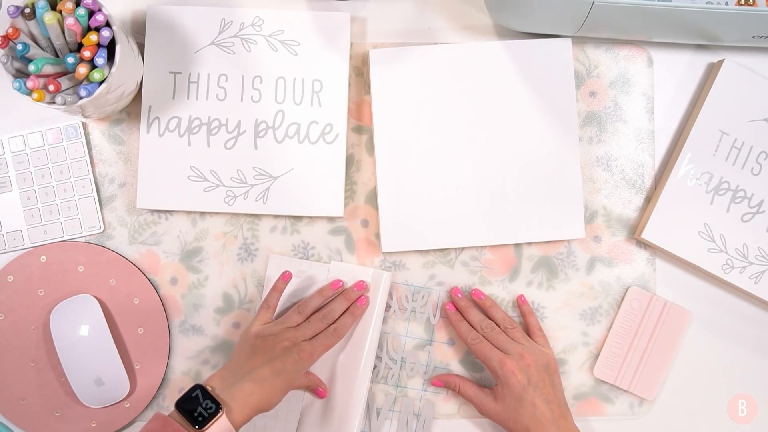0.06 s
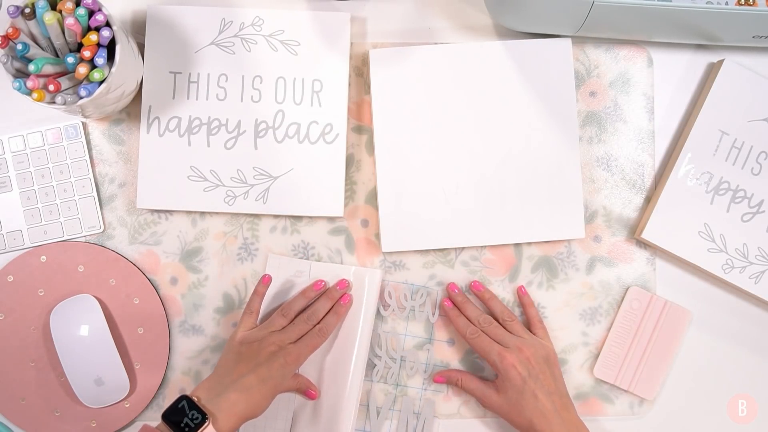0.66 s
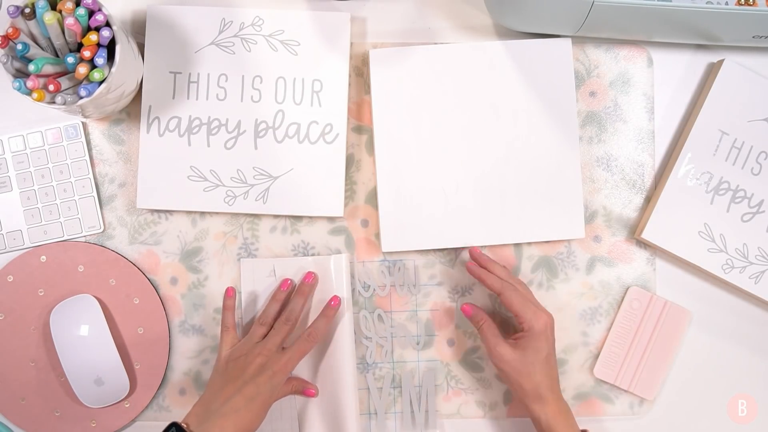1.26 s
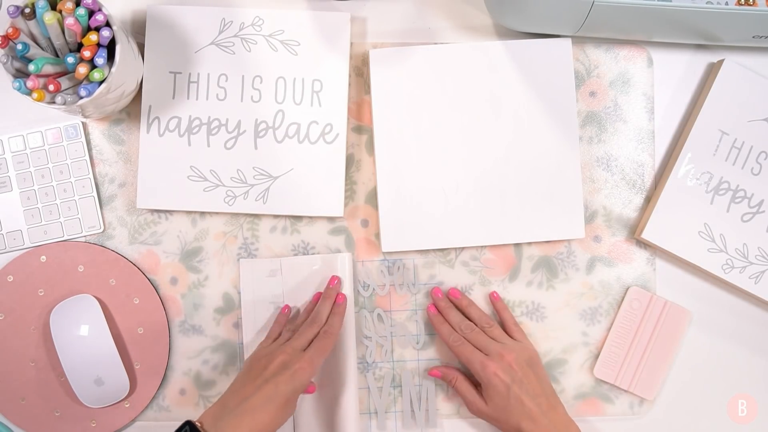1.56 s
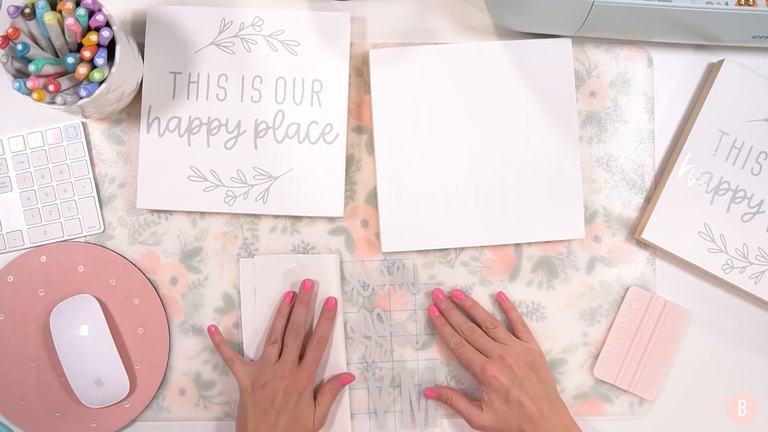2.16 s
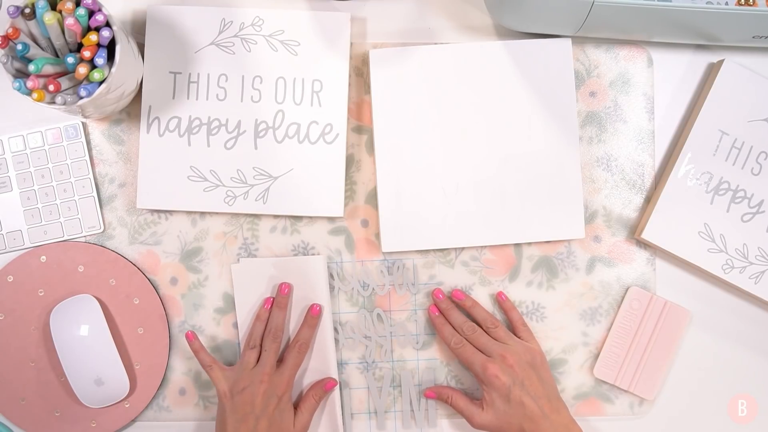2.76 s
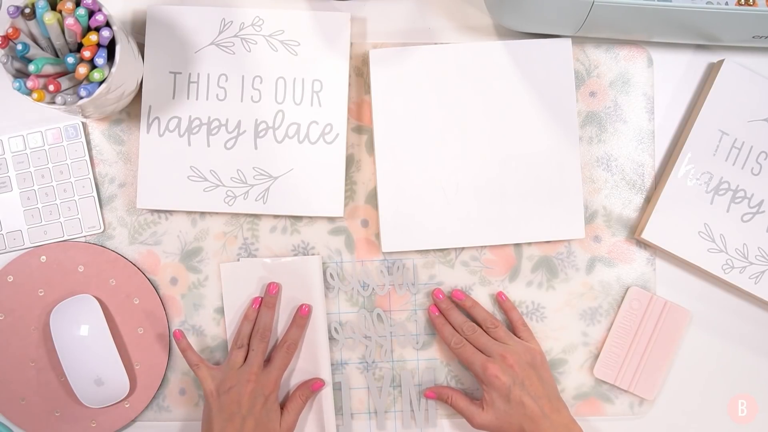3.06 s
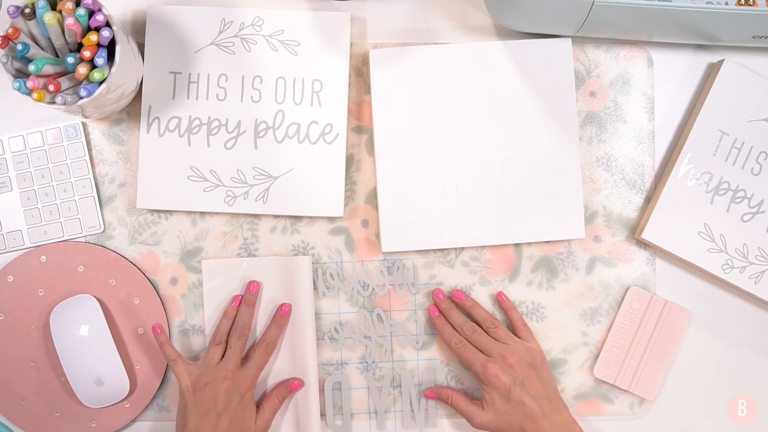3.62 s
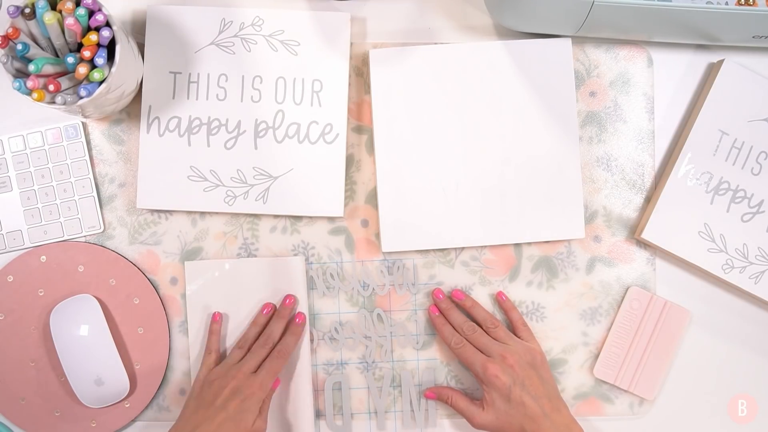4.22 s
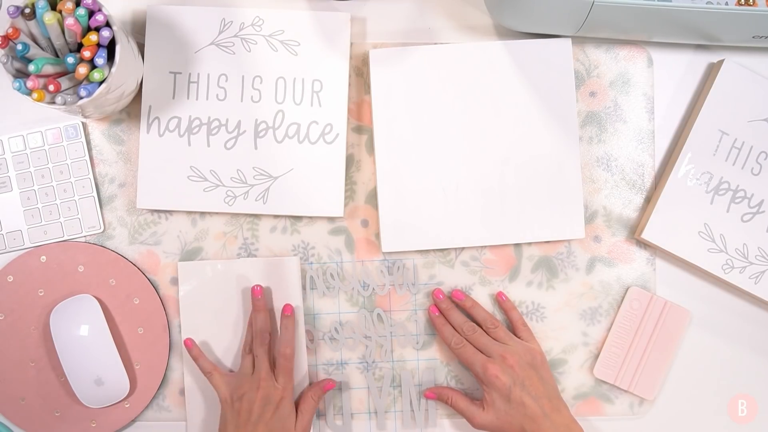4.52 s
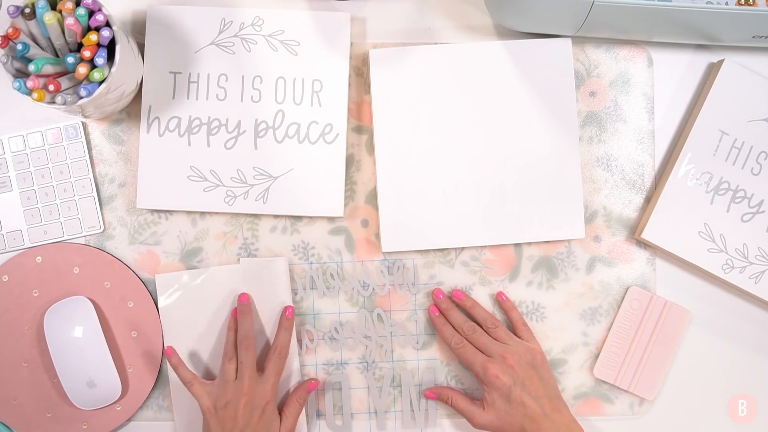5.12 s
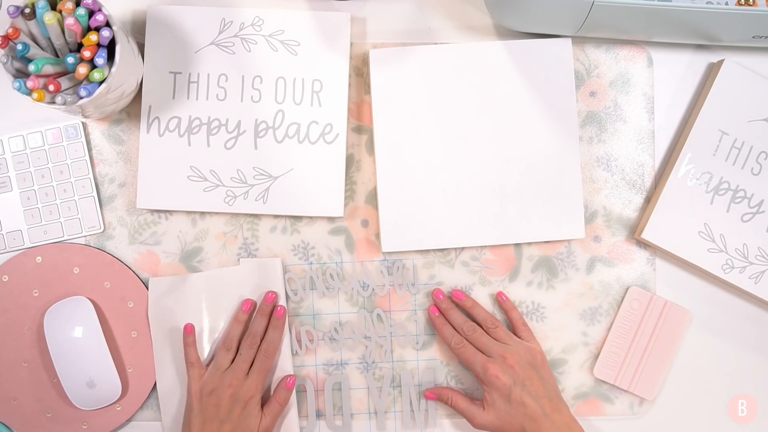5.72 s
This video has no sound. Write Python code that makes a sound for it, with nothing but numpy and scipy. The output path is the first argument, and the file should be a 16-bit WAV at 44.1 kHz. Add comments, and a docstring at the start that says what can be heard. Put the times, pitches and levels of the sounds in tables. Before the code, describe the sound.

In a small room with a faint electrical hum, a microphone over a table catches the soft, ticking crackle of paper coming away from sticky vinyl. The sheet snaps and briefly wobbles, a hand rubs across it, and the slow peeling continues. Past the middle the paper gives its loudest hollow pops between brief pulls, and it ends with brushing strokes and more crinkles.

```python
"""A craft table in a small room, one microphone above it; a faint mains hum throughout.
Backing paper is rolled slowly off adhesive vinyl: the glue lets go in a fine crackling hiss and
the curled sheet buckles in dry snaps. At one second the slack sheet wobbles, then a hand slides
over the paper for a new hold and the peeling goes on. The loudest hollow pops come after four
seconds, among short pulls; the last second is strokes of the hand and more snaps."""
import sys
import numpy as np
from scipy import signal
from scipy.fft import rfft, irfft, next_fast_len
from scipy.io import wavfile

SR = 44100
rng = np.random.default_rng(int(sys.argv[2]) if len(sys.argv) > 2 else 0)


def persist_wave(psi):
    """Save psi, clipped to +-1, as 16-bit WAV."""
    counts = np.round(np.clip(psi, -1, 1) * 32767).astype(np.int16)
    wavfile.write(sys.argv[1], SR, np.atleast_2d(counts).T)


N = 263718

# the three resonances of a paper crease, clack, tick and fizz: f/Hz, Q
CREASE_MODES = [(3050, 2.23), (6300, 2.1), (12800, 3.8)]


def from_db(db):
    """Decibels to gain."""
    return 10 ** (np.asarray(db) / 20)


def unit(x):
    """Scales to rms 1."""
    return x / np.sqrt(np.mean(x ** 2) + 1e-20)


def at_hz(points, hz):
    """Reads a table on a log-frequency axis."""
    f, value = np.transpose(points)
    return np.interp(np.log(hz + 1), np.log(f + 1), value)


def add(mix, s, sound):
    """Mixes a sound in at time s."""
    part = mix[max(round(s * SR), 0):][:len(sound)]
    part += sound[:len(part)]


def filtered(x, gain):
    """Applies a gain that is a function of frequency."""
    size = next_fast_len(len(x) + 2048)
    return irfft(rfft(x, size) * gain(np.fft.rfftfreq(size, 1 / SR)), size)[:len(x)]


def coloured(x, colour):
    """Equalises with a table of f/Hz, level/dB."""
    return filtered(x, lambda f: from_db(at_hz(colour, f)))


def drift(rate_hz):
    """A random wander of rms 1, mostly slower than rate_hz."""
    return unit(filtered(rng.standard_normal(N), lambda f: 1 / (1 + (f / rate_hz) ** 4)))


def paper_ring(hz, q, cutoff_ratio=2.21, size=1024):
    """A few cycles of damped paper with a rounded start, holding the energy of 1 ms at rms 1."""
    ratio = (np.fft.rfftfreq(size, 1 / SR) + 1) / hz
    resonance = 1 / (1 + 1j * max(q, .3) * (ratio - 1 / ratio)) ** 2
    lowpass = 1 / (1 + 1j * np.sqrt(2) * ratio / cutoff_ratio - (ratio / cutoff_ratio) ** 2)
    wave = irfft(resonance * lowpass, size)
    wave[size // 2:] = 0
    return wave / np.linalg.norm(wave) * np.sqrt(SR / 1000)


def reflections(x, tail_db=-5, build_s=0.001):
    """What reaches the microphone indirectly: nearby echoes, then the room's short diffuse tail."""
    # echoes off the table top and things on it: delay/s, gain
    echoes = [(.0011, .18), (.0029, .34), (.0044, .14), (.0074, -.2), (.0109, .21), (.0146, -.15),
              (.0185, .13), (.0225, .11)]
    # reverberation time of the room: f/Hz, t60/s
    decay = [(300, 0.36), (1000, 0.2457), (2000, 0.2857), (6000, 0.26), (15000, 0.13)]
    # colour that absorption leaves on the reflected sound: f/Hz, level/dB
    surface_colour = [(300, -3), (2000, -3), (4000, 1.5), (7000, -2.5), (15000, 2)]
    t = np.arange(SR // 4) / SR
    hz, frame_s, spectra = signal.stft(rng.standard_normal(len(t)), SR, nperseg=256)
    fading = from_db(-60 * frame_s / at_hz(decay, hz)[:, None])
    tail = signal.istft(spectra * fading, SR, nperseg=256)[1][:len(t)]
    tail *= 1 - np.exp(-t / build_s)
    response = from_db(tail_db) * tail / np.linalg.norm(tail)
    for delay, gain in echoes:
        # each sound leaves the sheet at another spot, so its echo paths differ a little
        add(response, delay * rng.uniform(.9, 1.1), np.array([gain]))
    return signal.fftconvolve(x, coloured(response, surface_colour))[:N]


def effort(moves, attack_s, release_s, swell_db):
    """Gains of body and treble as each move fades in, swells to its middle and fades out."""
    t, body, treble = np.arange(N) / SR, np.zeros(N), np.zeros(N)
    for start, length, db, bright_db in moves:
        age = t - start
        fade_in = np.clip(.5 + age / attack_s, 0, 1)
        fade_out = np.clip(.5 + (length - age) / release_s, 0, 1)
        off_centre = np.minimum((2 * age / length - 1) ** 2, 1)
        gain = fade_in * fade_out * from_db(db - swell_db * off_centre)
        body += gain
        treble += gain * from_db(bright_db)
    return body, treble


def friction(gains, colour, slips_per_s, spread_db, flutter_db, flutter_hz, room_db, body_db, treble_db):
    """Countless tiny slips of uneven size, coming in clumps; body and treble each follow their gain."""
    body_gain, treble_gain = gains
    sizes = from_db(spread_db * np.minimum(rng.exponential(1, N), 4.5)) * rng.choice([-1, 1], N)
    slipping = rng.random(N) < slips_per_s / SR
    slips = sizes * slipping * from_db(flutter_db * drift(flutter_hz))
    slips = coloured(slips + from_db(room_db) * reflections(slips), colour)
    body = filtered(slips, lambda f: 1 / (1 + (f / 4000) ** 8))  # below 4 kHz
    treble = slips - body
    return body_gain * from_db(body_db) * unit(body) + treble_gain * from_db(treble_db) * unit(treble)


def room_tone(air_db=-56.5, waver=0.16, wander_rad=0.46):
    """Still air of the room and the wavering hum of an appliance."""
    # spectrum of the air: f/Hz, level/dB
    air_colour = [(20, 12), (35, 9), (50, 2), (100, 1), (230, 0), (400, -3), (620, -9), (1100, -10),
                  (2000, -7), (3000, -13), (4300, -20), (6500, -21), (9500, -24), (15500, -26)]
    # tones of the appliance: f/Hz, rms level/dB
    hum_tones = [(29, -56), (59, -67), (120, -61), (168, -65), (298, -76.5), (402, -75), (880, -70.5)]
    air = coloured(rng.standard_normal(N), air_colour)
    air /= np.std(filtered(air, lambda f: f > 200))  # air_db is the level above 200 Hz
    t, hum = np.arange(N) / SR, np.zeros(N)
    for hz, db in hum_tones:
        amplitude = np.sqrt(2) * from_db(db) * (1 + waver * drift(3.4))
        hum += amplitude * np.sin(2 * np.pi * hz * t + wander_rad * drift(2.7))
    return from_db(air_db) * air + hum


def peeling(pull):
    """Glue parts from the backing in a dense, even crackle."""
    # spectrum of the parting glue: f/Hz, level/dB
    glue_colour = [(300, -58), (700, -9), (1100, -5), (1550, 3.5), (1850, 2), (2200, 5.5), (3100, 0.5),
                   (3700, -6.5), (4500, -10), (5900, -3.5), (7400, -7), (9500, -16.5), (12000, -19.5),
                   (15500, -25)]
    return friction(pull, glue_colour, slips_per_s=6000, spread_db=1.6, flutter_db=1.6, flutter_hz=39,
                    room_db=-3.5, body_db=-1.5, treble_db=-1)


def glue_ticks(pull_gain, per_s=22, level_db=-3, spread_db=3):
    """Now and then a larger spot of glue lets go; harder peeling makes the ticks louder."""
    sizes = from_db(level_db + spread_db * np.minimum(rng.exponential(1, N), 3))
    letting_go = rng.random(N) < per_s / SR
    ticks = signal.fftconvolve(pull_gain * sizes * letting_go, paper_ring(hz=7000, q=1))[:N]
    return ticks + reflections(ticks) / 2


def snaps(push_db=-22, clack_db=-7, fizz_db=-18.5, run_s=0.00084, run_share=0.38, crease_room_db=-1):
    """A paper panel flips with a pop and a push of air as its crease gives way in a run of ticks."""
    # loud buckles of the sheet: t/s, pop level/dB, pop f/Hz, pop Q, tick level/dB, crease brightness/dB
    buckles = [(0.136, -32.5, 1530, 0.97, -31.5, 7), (0.5716, -35.5, 1850, 1.2, -37, -10.5),
               (0.6856, -50, 2050, 3, -48.5, -25), (0.7439, -31.5, 2640, 2.3, -48, 0),
               (0.7629, -20, 1920, 1.04, -31.5, -13.5), (1.0477, -25, 1280, 0.34, -23, -1),
               (1.0654, -27, 1930, 1, -26, 0), (1.0937, -30, 1720, 0.67, -33.5, 9),
               (1.244, -37, 1540, 1.7, -50, 0), (1.2564, -39, 1550, 1, -42, 1),
               (1.468, -29, 2100, 2.7, -36, -6), (1.489, -32, 1220, 0.42, -54, 3),
               (1.7242, -33.5, 1690, 0.54, -37, 0), (1.8189, -31.5, 1670, 0.28, -54, 0),
               (1.8496, -31, 1340, 0.48, -49, -5), (1.9567, -32, 1330, 1.8, -57, 0),
               (1.9887, -23, 1140, 1.2, -43, -2), (2.1456, -34, 2270, 2.1, -34, 12),
               (2.2433, -41.5, 2220, 4, -43, 0), (2.422, -43, 2150, 7, -48, 2),
               (2.6026, -43, 1930, 0.73, -33, -1.5), (2.64, -36.5, 2230, 2.5, -34, 15),
               (2.6712, -34, 1750, 1.9, -29, 6), (3.0422, -45, 1530, 0.78, -34, 0),
               (3.1704, -41, 2400, 1.1, -34, 0), (3.184, -30.5, 1640, 0.45, -22, 0.5),
               (3.5972, -34, 1580, 0.97, -53, -26), (3.85, -37, 930, 0.58, -37.5, 12),
               (3.9366, -23.5, 1160, 1.9, -45, 0), (4.03, -26.5, 1830, 1.3, -40.5, 12),
               (4.1079, -28, 1720, 1.8, -41.5, -2), (4.1222, -31, 1900, 1.1, -45, -2),
               (4.1287, -7, 1830, 2.07, -31, -14), (4.4869, -24.5, 1410, 0.66, -27, 8.5),
               (4.4916, -23.5, 1900, 2.4, -29, -14.5), (4.5439, -27, 1560, 2, -42.5, -17),
               (4.5978, -37, 1830, .74, -41, -8), (4.6288, -10, 1400, 1.26, -29, -11),
               (4.8452, -36.5, 1900, 5.5, -34.5, 0), (4.9404, -31.5, 1620, 0.76, -40.5, -4),
               (5.045, -18.5, 1650, 2.3, -62, 0), (5.066, -20, 1240, 1.1, -46, 6),
               (5.076, -24.5, 1560, 1.6, -58, 0), (5.1623, -37.5, 1400, 0.87, -38.5, 3),
               (5.303, -36.5, 1660, 0.38, -56, 3), (5.3187, -26.5, 1240, 4, -42, -12),
               (5.3227, -27, 1090, 0.28, -45, -7), (5.4211, -17.5, 1640, 0.9, -30.5, -6),
               (5.4647, -24, 1150, 0.16, -61, 0), (5.4679, -30.5, 1600, 1.1, -46, 0),
               (5.698, -38.5, 2020, 0.58, -31, 3), (5.7131, -31, 2150, 1.5, -23, 11.5),
               (5.7737, -48, 1630, 1.3, -33, -6.5), (5.9697, -37, 2350, 2.6, -37.5, 0)]
    out, t = np.zeros(N), np.arange(256) / SR
    giving_way = run_share * np.exp(-t / run_s)
    modes = [paper_ring(hz, q, cutoff_ratio=1.8) for hz, q in CREASE_MODES]
    for s, pop_db, hz, q, tick_db, bright_db in buckles:
        # a well-damped panel moves more air than one that rings, and its crease sounds broader
        push = from_db(push_db) / max(q, 1) * paper_ring(hz=400, q=1)
        flank_db = tick_db - 5 * np.log2(q)  # clack and fizz lose 5 dB per doubling of Q
        mode_levels = flank_db + clack_db - bright_db, tick_db, flank_db + fizz_db + bright_db
        rings = [from_db(db) * mode for db, mode in zip(mode_levels, modes)]
        pop = from_db(pop_db) * (paper_ring(hz, q) + push)
        add(out, s, pop)
        for ring in rings:
            run = (t == 0) + rng.standard_normal(len(t)) * giving_way
            add(out, s, np.std(ring) * unit(np.convolve(ring, run)[:len(ring)]))
        add(out, s, reflections(pop))
        add(out, s, from_db(crease_room_db) * reflections(sum(rings)))
    return out


def crinkles(handling, count=30, top_db=2, range_db=6, flex_hz=1850, octaves=0.18, room_db=-1):
    """Faint buckles at random moments, as strong as the sheet is being handled."""
    out, tick = np.zeros(N), paper_ring(*CREASE_MODES[1])
    for when, size, pitch in rng.random((count, 3)):
        flex = paper_ring(flex_hz * 2 ** (octaves * (2 * pitch - 1)), q=2.5)
        gain = handling[int(when * N)] * from_db(top_db - range_db * (1 - size))
        add(out, when * N / SR, gain * (flex + tick))
    return out + from_db(room_db) * reflections(out)


def wobbling(sag=0.017, flutter_hz=40, flutter_rad=0.71):
    """Soft, unsteady low notes of the slack sheet, sinking as it relaxes."""
    # wobbles of the loosened sheet: t/s, f/Hz, level/dB, length/s
    wobbles = [(1.064, 139, -54, 0.075), (1.067, 302, -50, 0.058), (1.077, 564, -54, 0.15),
               (1.156, 442, -53.5, 0.078), (4.615, 188, -49.5, 0.066), (5.046, 390, -53.5, 0.084)]
    out = np.zeros(N)
    for s, hz, db, length in wobbles:
        progress = np.linspace(0, 1, int(length * SR))
        cycles = np.cumsum(hz * (1 + sag * (.5 - progress))) / SR
        note = np.sin(2 * np.pi * cycles + flutter_rad * drift(flutter_hz)[:len(progress)])
        add(out, s, from_db(db) * np.sin(np.pi * progress) * unit(note))
    return out


def sliding(stroke):
    """Skin and paper drag over paper, with a coarser grain than the glue."""
    # spectrum of the rubbed paper: f/Hz, level/dB
    rub_colour = [(200, -32), (550, -12.5), (850, -5), (1400, 2), (2100, 2.5), (3000, -4), (4200, -12),
                  (5400, -4.5), (7200, -7), (9800, -17), (12500, -20), (15500, -28)]
    return friction(stroke, rub_colour, slips_per_s=2700, spread_db=2, flutter_db=2.05, flutter_hz=57.6,
                    room_db=-1, body_db=-1, treble_db=-2)


def scene():
    """All sources at one microphone above the table."""
    # pulls on the backing, each a swell of crackling hiss: t/s, length/s, level/dB, brightness/dB
    pulls = [(-0.2, 0.72, -54, -4.5), (0.48, 0.54, -50.5, -5), (1.1, 0.12, -52.5, -4),
             (1.25, 0.1, -56, -4.5), (2.14, 0.25, -59, -1), (2.45, 0.41, -50, -1), (2.88, 0.58, -49.5, -3),
             (3.53, 0.17, -52, -7), (4.33, 0.11, -50, -4), (4.74, 0.11, -55, -2), (4.93, 0.22, -50.5, -5)]
    # strokes of the hand over the paper: t/s, length/s, level/dB, brightness/dB
    strokes = [(1.425, 0.088, -43, 0), (1.515, 0.042, -45, -5.5), (1.57, 0.059, -41, -3.5),
               (1.68, 0.19, -42.5, -1), (1.89, 0.17, -47.5, -4), (3.83, 0.15, -44, -2.5),
               (4.18, 0.15, -46.5, -4.5), (4.44, 0.14, -44.5, 1.5), (5.17, 0.14, -43, -5.5),
               (5.295, 0.065, -39.5, -10), (5.38, 0.18, -49.5, -1.5), (5.66, 0.22, -48, -0.5),
               (5.92, 0.15, -45.5, -2.5)]
    pull = effort(pulls, attack_s=0.11, release_s=0.11, swell_db=6)
    stroke = effort(strokes, attack_s=0.061, release_s=0.086, swell_db=5.05)
    pull_gain, stroke_gain = pull[0], stroke[0]
    handling = np.maximum(pull_gain, stroke_gain)
    paper = snaps() + crinkles(handling) + sliding(stroke) + wobbling()
    return (paper + peeling(pull) + glue_ticks(pull_gain) + room_tone())[None]


def record(dry):
    """The recorder passes nothing much above 16.1 kHz."""
    lowpass = signal.firwin(401, 16100, window=("kaiser", 8), fs=SR)
    return signal.oaconvolve(dry, lowpass[None], "same")


dry = scene()
out = record(dry)
persist_wave(out)
```